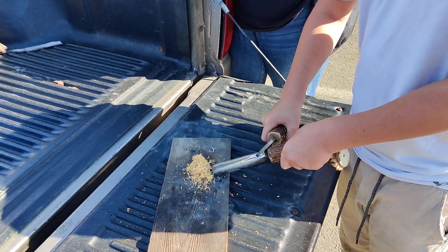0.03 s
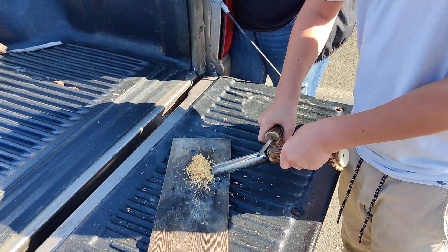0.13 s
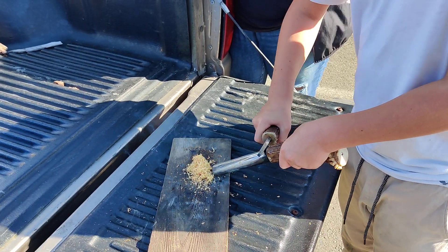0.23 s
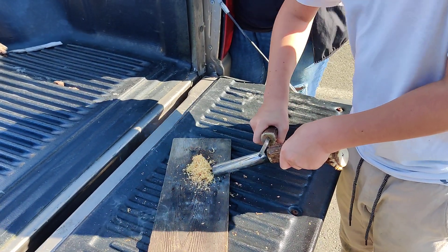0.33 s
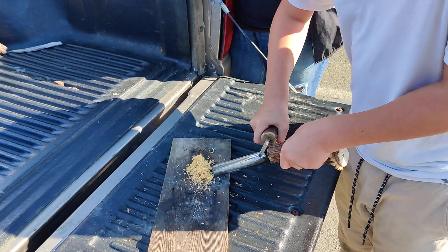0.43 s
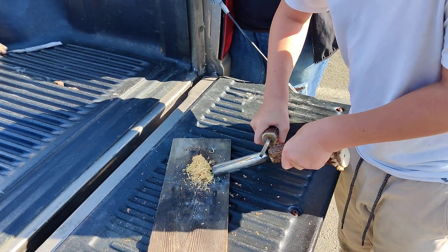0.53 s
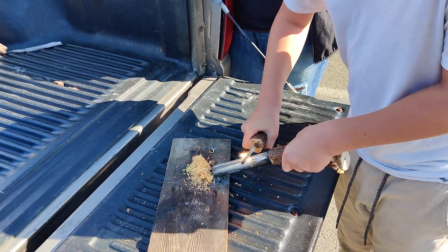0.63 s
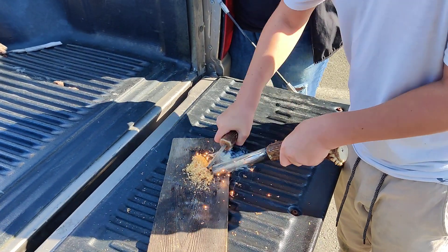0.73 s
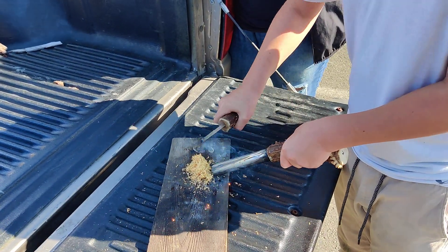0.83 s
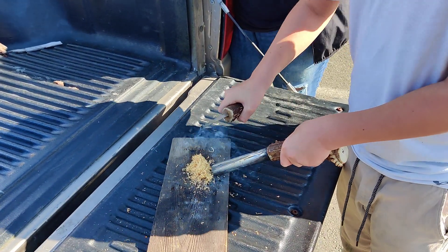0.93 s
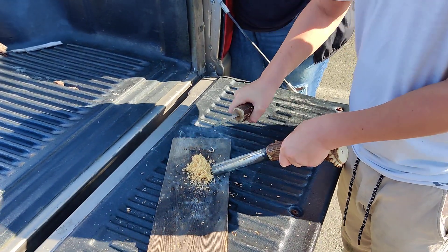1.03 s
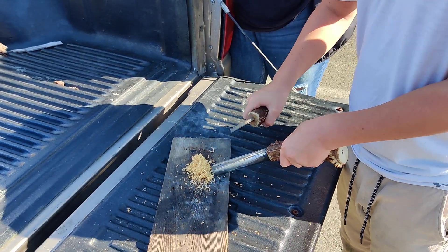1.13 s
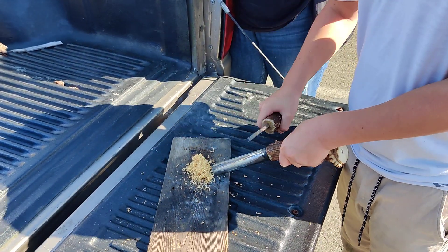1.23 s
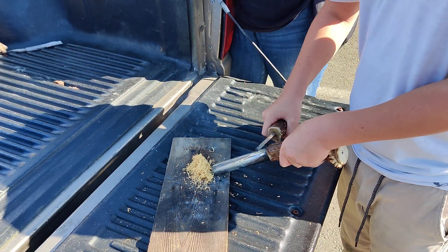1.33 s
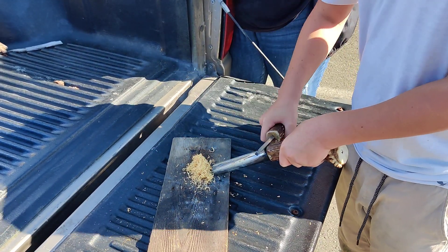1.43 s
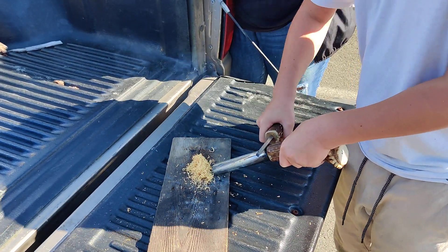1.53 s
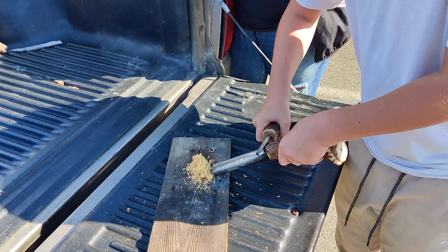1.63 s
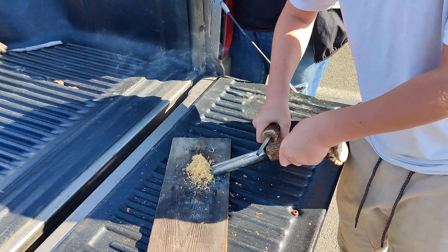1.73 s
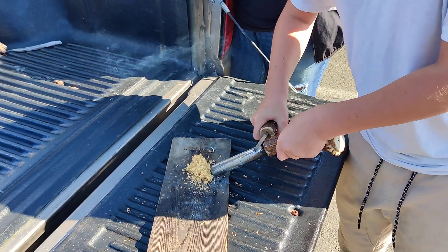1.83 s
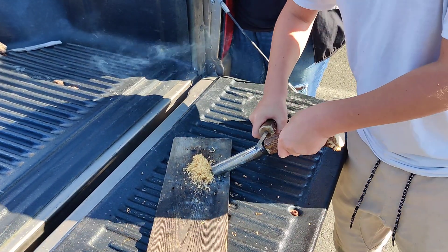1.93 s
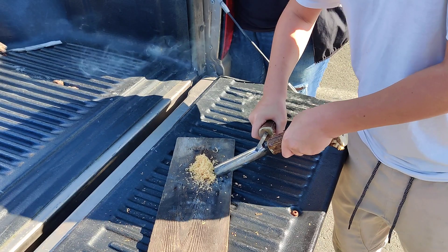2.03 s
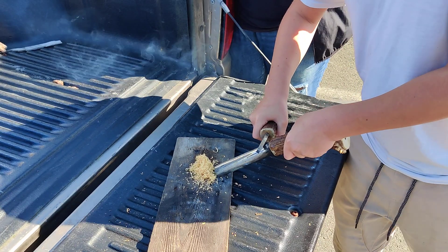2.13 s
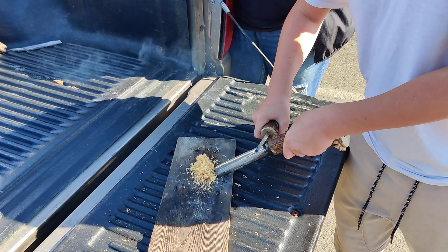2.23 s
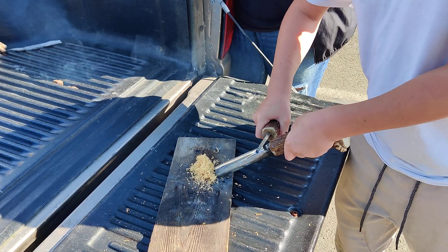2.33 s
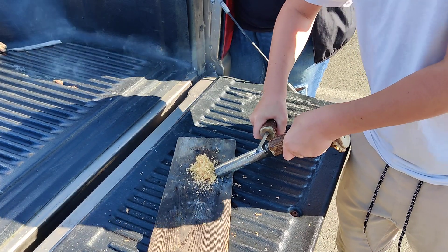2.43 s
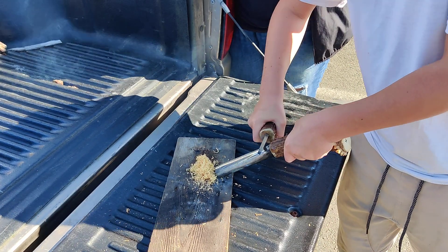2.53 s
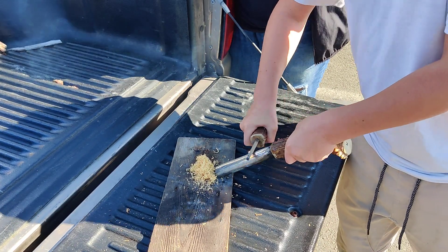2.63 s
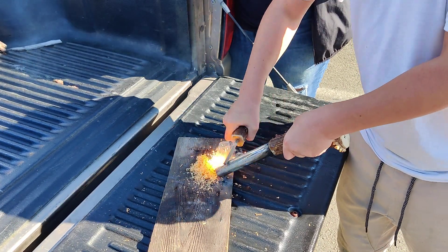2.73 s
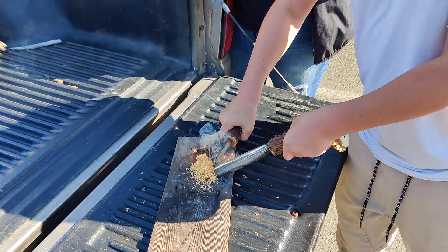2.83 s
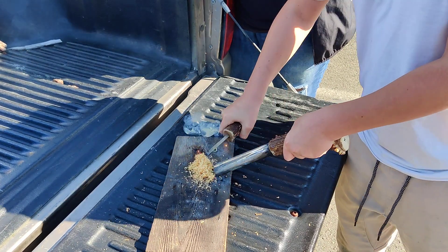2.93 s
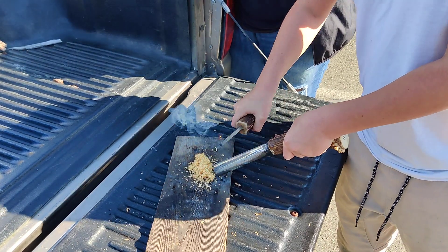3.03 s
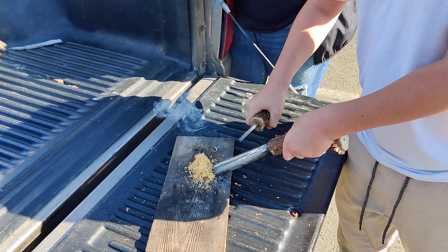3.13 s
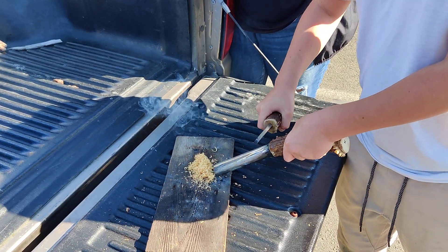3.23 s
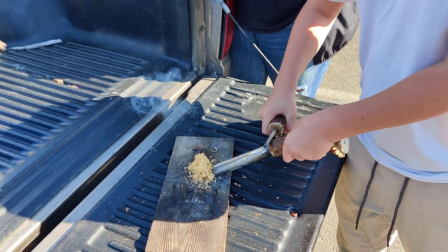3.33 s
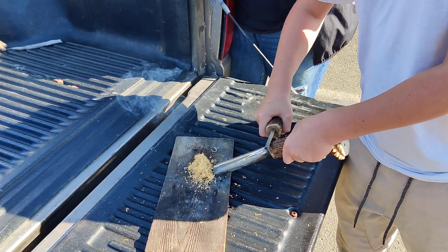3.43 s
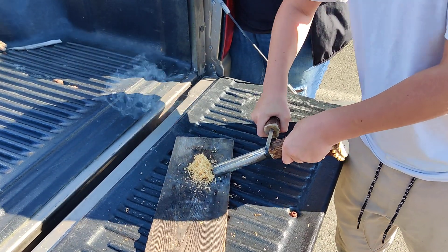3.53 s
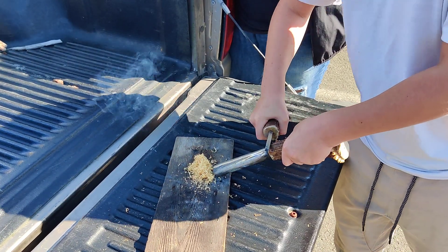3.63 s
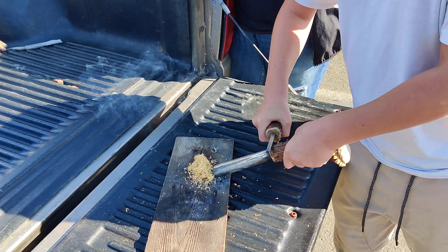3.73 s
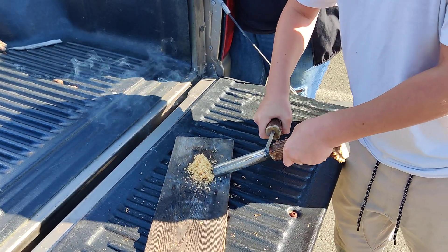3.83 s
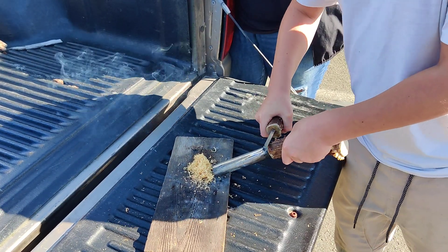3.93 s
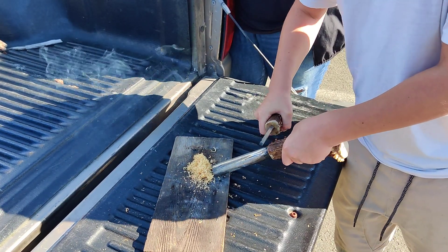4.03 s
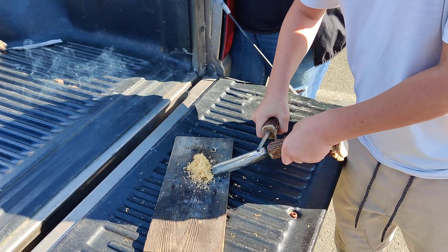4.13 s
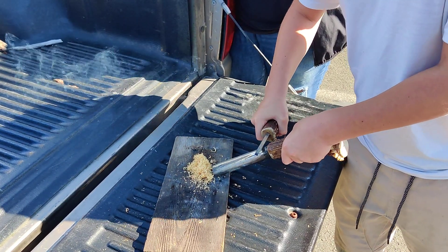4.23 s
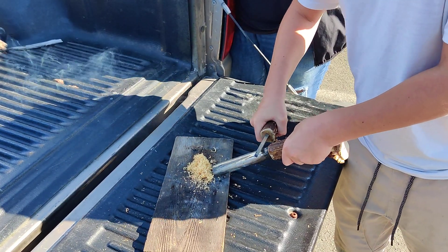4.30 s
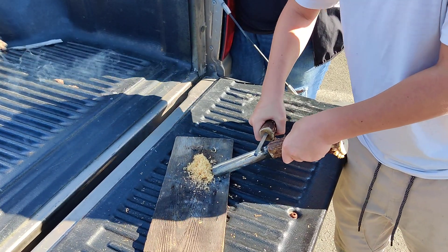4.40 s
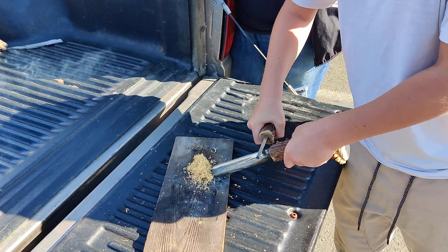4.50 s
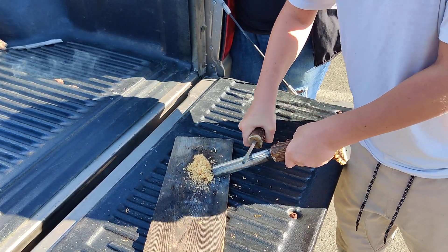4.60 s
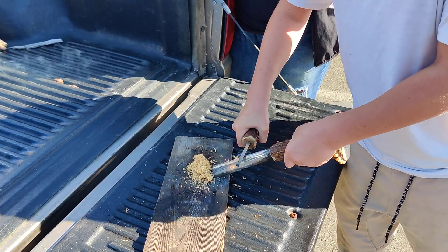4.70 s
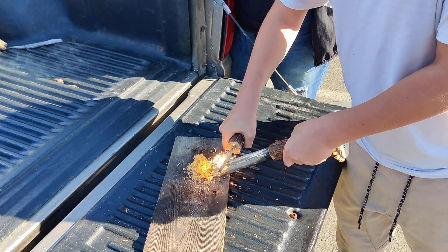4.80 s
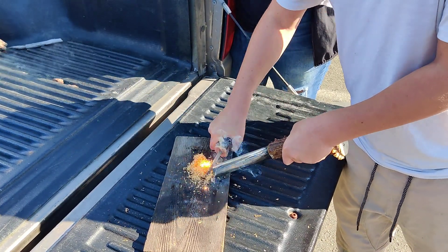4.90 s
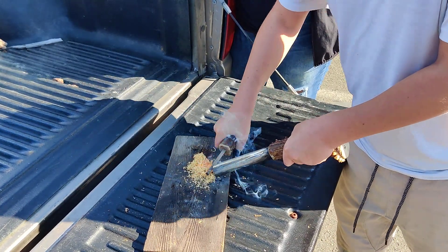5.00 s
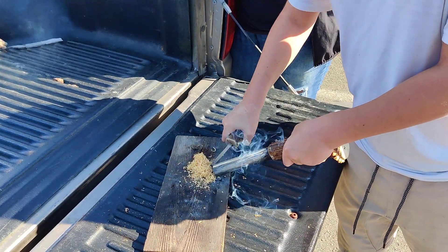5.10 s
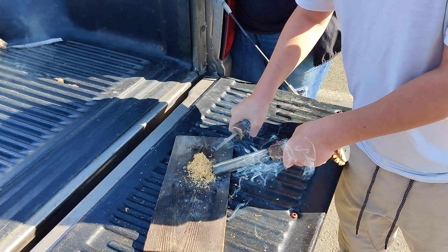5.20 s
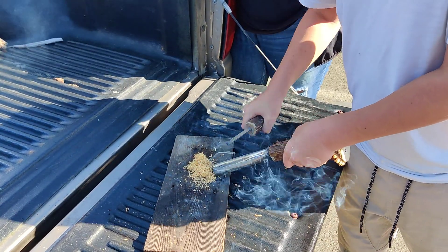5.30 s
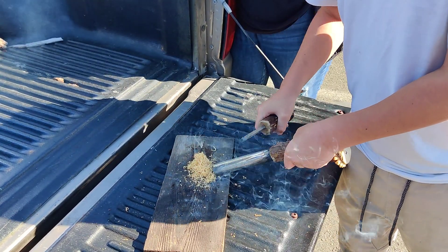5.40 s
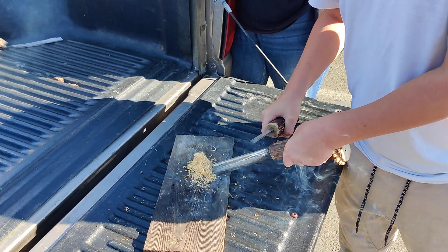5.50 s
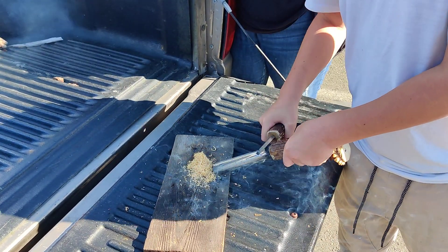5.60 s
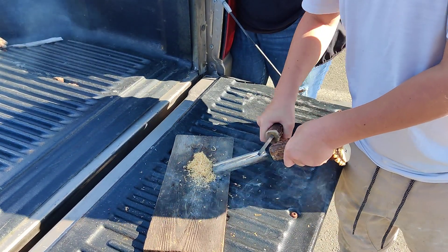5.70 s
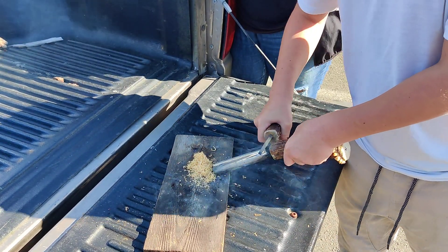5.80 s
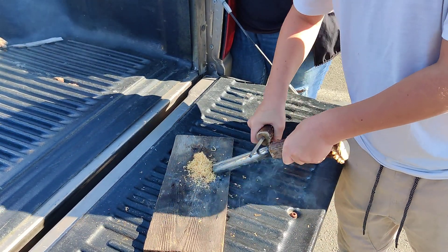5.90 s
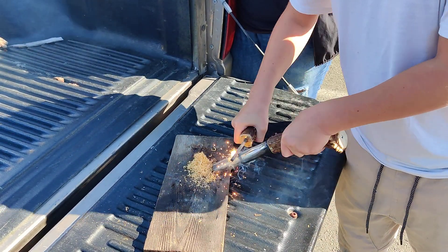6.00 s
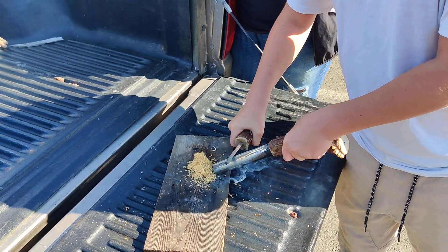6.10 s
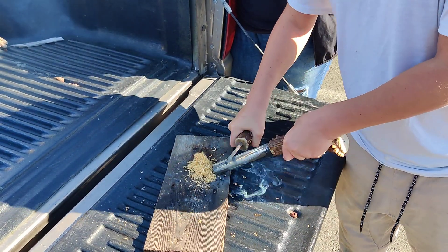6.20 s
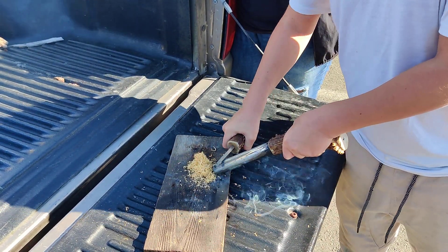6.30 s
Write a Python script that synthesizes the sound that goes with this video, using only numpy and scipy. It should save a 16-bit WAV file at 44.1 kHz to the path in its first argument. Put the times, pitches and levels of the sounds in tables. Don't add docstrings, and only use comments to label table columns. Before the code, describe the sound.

Close up outdoors, a steel blade taps and scrapes down a ferro rod: a hard, gritty rasp with sizzling sparks, a clear clink, a second even rasp, more clinks, then a third stroke ending in a loud slam that booms through the tailgate. A final clink and short rasp follow. Distant traffic and light wind rumble softly behind a phone microphone.

```python
import sys
import numpy as np
from scipy import signal
from scipy.fft import rfft, irfft, next_fast_len
from scipy.io import wavfile
from scipy.ndimage import uniform_filter1d, minimum_filter1d

SR = 44100
rng = np.random.default_rng(int(sys.argv[2]) if len(sys.argv) > 2 else 0)


def digitize_waveform(pressure):
    field = np.atleast_2d(pressure).T
    bounded = np.clip(field, -1, 1)
    quanta = np.round(bounded * 32767).astype(np.int16)
    wavfile.write(sys.argv[1], SR, quanta)


def volts_from_decibels(level):
    exponent = np.asarray(level, float) / 20
    return 10 ** exponent


N = 280035
T = np.arange(N) / SR


def unit(x):
    return x / np.sqrt(np.mean(x ** 2))


def walk(rate, size=N):
    hold = int(SR / rate)
    levels = np.repeat(rng.standard_normal(size // hold + 1), hold)
    return 0.854 * uniform_filter1d(uniform_filter1d(levels, hold), hold)[:size]


def band(x, hz, width):
    return signal.sosfilt(signal.butter(2, [hz - width / 2, hz + width / 2], "band", fs=SR, output="sos"), x)


def ring(modes, rise, spread_hz):
    hz, db, t60 = np.transpose(modes)[:, :, None]
    t = np.arange(int(SR * t60.max())) / SR
    turn = rng.standard_normal((len(hz), 1)) * np.minimum(hz / spread_hz, 2)
    fade = volts_from_decibels(db) * np.exp(-np.log(1000) * t / t60) * (1 - np.exp(-t / rise))
    return np.array([fade * np.sin(2 * np.pi * hz * t + side * turn / 2) for side in (1, -1)])


def bed(x, t60, db, low_hz, high_hz):
    t = np.arange(int(SR * t60)) / SR
    tail = rng.standard_normal((2, SR // 2))[:, :len(t)] * np.exp(-np.log(1000) * t / t60) * (t > .001)
    tail = signal.sosfilt(signal.butter(2, [low_hz, high_hz], "band", fs=SR, output="sos"), tail)
    tail = tail / np.sqrt(np.sum(tail ** 2) / 2)
    return x + volts_from_decibels(db) * signal.oaconvolve(x, tail, axes=1)[:, :N]


def both(mono, pan_db):
    return mono * volts_from_decibels(np.array([pan_db, -pan_db]) / 2)


# f/Hz, level/dB [per Hz]
FIELD_SPECTRUM = [(20, 0.5), (55, -1), (110, -10.5), (210, -14.5), (320, -26), (480, -30), (800, -22),
                  (1050, -24.5), (1300, -32), (2300, -34), (2800, -44), (5000, -47), (6600, -57.5),
                  (16000, -53.5)]
# f/Hz, correlation left to right [0-1]
COHERENCE = [(20, .3), (50, .45), (80, .75), (125, .96), (290, .92), (640, .75), (1400, .5), (3000, .15),
             (16000, .02)]
# peak t/s, level/dB [over the breeze], half length t/s
GUSTS = [
    (0.14, 0, 0.1557),
    (1.885, 4.5, 0.14),
    (3.185, 6.5, 0.1082),
    (4.105, 5, 0.063),
    (4.689, 7.5, 0.254),
    (5.005, 7.5, 0.148),
    (5.37, 15, 0.095),
    (5.737, 6, 0.154),
    (6.097, 7.5, 0.114),
    (6.35, 2.5, 0.0908),
]


def field():
    size = next_fast_len(N)
    hz = np.fft.rfftfreq(size, 1 / SR) + 1
    like_hz, correlation = np.transpose(COHERENCE)
    like = np.clip(np.interp(np.log(hz), np.log(like_hz), correlation), 0, 1)
    field_hz, field_db = np.transpose(FIELD_SPECTRUM)
    tint = volts_from_decibels(np.interp(np.log(hz), np.log(field_hz), field_db))
    mid, side = rfft(rng.standard_normal((2, size))) * tint
    air = np.array([np.sqrt(1 + like) * mid + sign * np.sqrt(1 - like) * side for sign in (1, -1)])
    air = air * volts_from_decibels(-42) / np.sqrt(np.mean(irfft(air.mean(axis=0), size) ** 2))
    breeze_db = 1.5
    gust = breeze_db + sum(db * np.clip(1 - np.abs(T - s) / half, 0, 1) for s, db, half in GUSTS)
    out, swell = 0, .5 * walk(1.5)
    for centre in np.arange(4., 15):
        octave = np.clip(1 - np.abs(np.log2(hz) - centre), 0, 1)
        windy = np.clip((6.9 - centre) / 0.8, 0, 1)
        out = out + irfft(air * octave, size)[:, :N] * volts_from_decibels(windy * gust + swell + 2.0 * walk(4.163))
    return out


# start t/s, length t/s, peak level/dB
RUSTLES = [
    (2.148, 0.368, -74),
    (2.945, 0.408, -73),
    (5.226, 0.509, -67.5),
    (5.763, 0.42, -71.5),
]
# f/Hz, width f/Hz, level/dB
RUSTLE_BANDS = [(3710, 540, -1), (4950, 464, 2), (5596, 640, -0.5)]


def hisses():
    gain = sum(volts_from_decibels(db) * np.sin(np.pi * np.clip((T - s) / length, 0, 1)) for s, length, db in RUSTLES)
    gain = gain * volts_from_decibels(2.8 * walk(27))
    rustle = gain * sum(volts_from_decibels(db - 1.5) * unit(band(rng.standard_normal((2, N)), hz, width))
                        for hz, width, db in RUSTLE_BANDS)
    insects = unit(band(rng.standard_normal((2, N)), hz=8023, width=1450))
    return rustle + volts_from_decibels(-75.5 + 2.4 * walk(2.0)) * insects


# t/s, level/dB
SLAM = [
    (5.003, 3),
    (5.0045, 5),
    (5.0068, 6),
    (5.0133, -0.5),
    (5.022, -4),
    (5.046, -13),
    (5.088, -12.5),
]
# f/Hz, level/dB, t60 t/s
TAILGATE = [(148.7, -11.5, 0.58), (196.4, -8.5, 0.626), (257.9, -17.5, 0.91), (320.9, -20, 0.953),
            (393, -11.5, 0.29), (472, 4.5, 0.116), (558.3, -15.5, 0.088), (610, -21.5, 0.17),
            (691.2, 4.5, 0.088), (788, -2.5, 0.129), (928, -1.5, 0.15), (1119, -1.5, 0.135),
            (1230, 1.5, 0.076), (1354, 8, 0.0435), (1546.5, 6.5, 0.0564), (1801.7, -2.5, 0.097),
            (2158, 5, 0.03266), (2715, -4.5, 0.067), (3180, -9.5, 0.086), (4168, -3.5, 0.062),
            (5370, -2.5, 0.071), (6464, 3.5, 0.02906), (7260, -25.5, 0.06)]


def slam():
    out, start, size = np.zeros((2, N)), int(SLAM[0][0] * SR), SR // 4
    push = np.zeros((1, size))
    for s, db in SLAM:
        age = T[start:start + size] - s
        rattle = volts_from_decibels(db - 25.5) * np.exp(-np.abs(age) / 0.0141) * rng.standard_normal(size)
        push[0] += (age >= 0) * (volts_from_decibels(db) * np.exp(-np.abs(age) / 0.00006) + rattle)
    crowd = np.repeat(TAILGATE, 6, axis=0)
    crowd = crowd * np.exp(rng.standard_normal(crowd.shape) * [.045, 0, .12]) * [1, 1, .85]
    crowd[:, 1] += 1 * (crowd[:, 0] < 420)
    response = ring(crowd, rise=0.5 / crowd[:, :1], spread_hz=1960)
    signs = rng.choice([-1, 1], (len(crowd), 1))
    sheet = unit((response * signs).sum(axis=1))
    boom = signal.fftconvolve(push, sheet, axes=1)[:, :N - start]
    out[:, start:start + boom.shape[1]] = boom / np.abs(boom).max()
    return volts_from_decibels(-1) * bed(out, t60=0.48, db=-21.5, low_hz=400, high_hz=2490)


# f/Hz, level/dB, t60 t/s
HANDLE = [(154.1, 2.5, 0.0463), (230.2, 0.5, 0.037), (292.4, -14.5, 0.21), (425.1, -4.5, 0.1038),
          (337.2, 3.5, 0.04), (455.6, 3, 0.08766), (550.6, 6.5, 0.0682), (505.7, 1, 0.1228),
          (593.3, 4, 0.09), (707.7, 10, 0.0411), (809.3, 15, 0.02007), (648, 13, 0.029)]
ROD = [(1276.6, -7.5, 0.0399), (1511, -9, 0.043), (1666, 2, 0.019), (1850, 6, 0.013477),
       (1890, -6.5, 0.08649), (2143.4, 0.5, 0.0211), (2300, -6, 0.0296), (2719, -7.5, 0.0668),
       (2026, 4, 0.01135)]
BLADE = [(3325, -8, 0.0203), (3656, -10.5, 0.0472), (4171, -9, 0.0357), (4413, -12.5, 0.029),
         (5373, -6, 0.027), (5638, -2.5, 0.02813), (5800.5, -4, 0.0282), (5708, -2, 0.00707),
         (6034, -13.5, 0.03), (8150, -7.5, 0.0037), (7754, -10, 0.0107), (9527, -16.5, 0.0134),
         (6682, 31, 0.00109)]
SIZZLE = [(10180, -1.5, 0.0098), (9695, -3.5, 0.022), (11510, 5, 0.0145), (12930, -8, 0.021),
          (12635, 11, 0.0077), (13827, 4.5, 0.0277), (15050, 8, 0.021), (15220, -16.5, 0.011),
          (11420, 14.5, 0.000593)]


def strike(blows, part, rises):
    out = np.zeros((2, N + SR))
    for s, blade, handle, rod, sizzle, pan in blows:
        for modes, over_db, rise in zip((HANDLE, ROD, BLADE, SIZZLE), (handle, rod, 0, sizzle), rises):
            struck = np.repeat(modes[part], 3, axis=0)
            spot = volts_from_decibels(3.73 * rng.standard_normal((len(struck), 1)))
            detune = np.exp(rng.standard_normal((len(struck), 1)) * [.018, 0, 0])
            struck = struck * detune * [1, 1, .75]
            response = (ring(struck, rise, spread_hz=470) * spot).sum(axis=1)
            start = int((s - rises[2]) * SR)
            size = both(volts_from_decibels(blade + over_db + 2.0), np.array([pan])) / np.abs(response).max()
            out[:, start:start + response.shape[1]] += size * response
    return out[:, :N]


# t/s, crack peak level/dB, rod level/dB and sizzle level/dB [over it], left minus right level/dB
POPS = [(0.8379, -37, -6, 5.5, 1.5), (0.8769, -43, -11.5, 4.5, -16), (0.8825, -38, -12.5, -4.5, 7),
        (0.8937, -44.5, -33, -2.5, -1.5), (0.9218, -48, -11, -2, -2.0), (1.6222, -37, -25, -2.5, 6),
        (1.7828, -50, 0, -8.5, -10.5), (1.927, -36.5, -28, -2, -4), (1.9665, -39.5, -10, -6.5, -7),
        (2.0657, -33.5, -16, -5.5, -1), (2.355, -51, -14, -21.5, -2), (3.0848, -46, -4.5, -2.5, -4),
        (3.2563, -43, -9.5, 10, 2), (6.2686, -42, 0, -4, 6.5)]


def pops():
    board_db = -14
    blows = [(s, db, board_db, rod, sizzle, pan) for s, db, rod, sizzle, pan in POPS]
    return strike(blows, slice(-1, None), rises=(0.0017, 0.000166, 0.00033, 0.000056))


# t/s, blade peak level/dB, handle level/dB and rod level/dB [over it], left minus right level/dB
TAPS = [(0.5749, -49, -11, -12, 15.5), (1.48, -14, -14.5, -14, 0.5), (2.9149, -28.5, -11.5, -4, 1),
        (3.3131, -53.5, -1, 1, 5.5), (3.4035, -41.5, 8.5, -2.5, 1), (4.2395, -16.5, -10, -6.5, -1.5),
        (4.3603, -51.5, -4.5, 4, 4.5), (4.648, -36, -27.5, 5.5, -1.5), (5.0884, -33, 9.5, -8.5, -1),
        (5.208, -39, 4, -3, 1.5), (5.219, -43, 0, 3, 0), (5.6965, -16, -11, -5, 1),
        (6.337, -35, -13, -2.5, 8.5)]


def taps():
    sizzle_db = -14
    blows = [(s, db, board, rod, sizzle_db, pan) for s, db, board, rod, pan in TAPS]
    return strike(blows, slice(-1), rises=(0.0296, 0.00213, 0.001, 0.0003))


# t/s, peak level/dB, length t/s, f/Hz
CATCHES = [(0.713, -18.5, 0.0104, 2017), (0.745, -21, 0.0082, 2024), (0.7629, -15, 0.0126, 1607),
           (0.785, -25, 0.0203, 2300), (2.702, -21.5, 0.014, 1850), (2.743, -20.5, 0.0142, 1850),
           (2.9, -29, 0.0089, 1965), (4.653, -33, 0.0415, 2193), (4.863, -34.5, 0.0176, 2229),
           (5.966, -33.5, 0.0121, 2253), (5.996, -25, 0.0044, 2300), (6.013, -23, .008, 1957),
           (6.03, -31, .02, 2086), (5.001, -7, 0.00834, 1298), (4.989, -15.5, .004, 2092),
           (6.004, -25, 0.01904, 510.4), (6.042, -25.5, 0.0094, 526), (2.897, -29, 0.0204, 544.2),
           (0.718, -34, 0.0244, 512.4), (2.066, -41, 0.004, 3043), (6.16, -40, 0.0096, 2947)]


def catches():
    out, size = np.zeros((2, N + SR)), SR // 10
    for s, db, length, hz in CATCHES:
        start, age = int(s * SR), T[:size] / length
        shape = np.clip(age * 4.1, 0, 1) * np.clip(1.5 - age, 0, 1)
        jitter = 0.0903 * np.cumsum(rng.standard_normal(size))
        tone = unit(np.sin(2 * np.pi * hz * T[:size] + jitter))
        out[:, start:start + size] += volts_from_decibels(db - 8.5) * shape * tone
    return out[:, :N]


def brush(start, length, db, speed, dig):
    land_s, lift_s, edge_db = .006, .014, -46.5
    times = (start - land_s, start, start + length, start + length + lift_s)
    return [(s, db + edge, speed, dig) for s, edge in zip(times, (edge_db, 0, 0, edge_db))]


# t/s, blade pressure level/dB, speed [0-1], how deep the edge digs [0-1]
STROKES = [
    [(0.663, -52, 0.47, 0.22), (0.69, -38.5, 0.5, 0.65), (0.713, -32.5, 0.99, 0.72),
     (0.745, -24.5, 0.87, 0.26), (0.771, -22.5, 0.82, 0.68), (0.819, -41, 0.44, 1),
     (0.832, -80, 0.46, 0.93)],
    [(2.676, -39, 0.16, 0.41), (2.712, -32, 0.5, 0.74), (2.732, -31, 1, 0.11), (2.752, -28, 1, 0.86),
     (2.79, -28, 1, 0.47), (2.826, -35.5, 0.71, 0.42), (2.912, -40, 0.46, 0.35), (2.945, -69.5, 0.55, 1)],
    [(4.636, -54, 0.16, 0), (4.644, -31, 0.74, 0.31), (4.666, -33.5, 0.1, 0.25), (4.72, -38, 1, 0.33),
     (4.77, -36.5, 0.96, 0.05), (4.8, -35, 0.76, 0.12), (4.822, -38, 0.17, 0.56), (4.845, -32, 0.77, 0.49),
     (4.87, -27.5, 0.96, 0.39), (4.97, -35, 0.79, 0.76), (5.03, -24, 0.1, 1)],
    [(5.988, -47, 0.38, 0.95), (5.996, -33, 0.58, 0.53), (6.019, -28.5, 0.85, 0.62),
     (6.07, -26.5, 0.67, 0.2), (6.115, -39, 1, 0.23), (6.15, -67.5, 0.6, 0.69)],
]
# start t/s, length t/s, pressure level/dB, speed [0-1], dig [0-1]
BRUSHES = [(0.571, 0.0167, -57.5, 0.54, 0.8), (0.834, 0.01203, -47.5, 1, 0.91),
           (1.737, 0.0504, -56.5, 0.79, 0.62), (1.847, 0.058, -59, 0.57, 0.65),
           (1.991, 0.09, -56.5, .15, 1), (2.058, 0.0565, -48, 0.36, 0.66), (2.118, 0.0287, -59, .3, 0.4),
           (2.946, 0.0832, -60, 0.53, 1), (5.024, .075, -38.5, 0.7, .45),
           (5.964, 0.0109, -38.5, 0.31, 0.36), (6.16, 0.0556, -37, 0.05, 0.29),
           (6.334, 0.028, -39, 0.38, 0.69)]


def strokes():
    skim_db, dug_db = -10, 3.5
    slow_db, fast_db = -17.5, 0
    board_start_db, board_end_db = -8.5, -5.5
    pan_start_db, pan_end_db = 1, -1.98
    hum_db, hum_s = -1, 0.0806
    gains, pan_db, near = np.zeros((4, N)), np.zeros(N), np.zeros(N, bool)
    for stroke in STROKES + [brush(*row) for row in BRUSHES]:
        s, *controls = np.transpose(stroke)
        on = (T >= s[0]) & (T <= s[-1])
        blade, speed, dig = (np.interp(T[on], s, c) for c in controls)
        along = (T[on] - s[0]) / (s[-1] - s[0])
        rod = blade + skim_db + (dug_db - skim_db) * dig
        board = rod + board_start_db + (board_end_db - board_start_db) * along
        sizzle = blade + slow_db + (fast_db - slow_db) * speed
        gains[:, on] = np.hypot(gains[:, on], volts_from_decibels(np.array([board, rod, blade, sizzle])))
        pan_db[on] = pan_start_db + (pan_end_db - pan_start_db) * along
        near |= (T >= s[0] - .01) & (T <= s[-1] + .12)
    keep = np.exp(-1 / (hum_s * SR))
    gains[0] += volts_from_decibels(hum_db) * signal.lfilter([1 - keep], [1, -keep], gains[0])
    return uniform_filter1d(gains, 88, axis=1), pan_db, np.flatnonzero(near)


def grit(size, rate, scatter_db, judder_db):
    torn = rng.random(size) < rate / SR
    clicks = torn * rng.standard_normal(size) * volts_from_decibels(scatter_db * rng.exponential(size=size))
    return unit(clicks * volts_from_decibels(judder_db * (walk(250, size) + walk(60.226, size))))


FAMILY_PAN_DB = (1, 0, 1, -0.5)


def scrape():
    gains, pan_db, moving = strokes()
    grits = [grit(len(moving), rate=11000, scatter_db=1.06, judder_db=2.5) for _ in range(3)]
    out = np.zeros((2, N))
    families = (HANDLE, ROD, BLADE, SIZZLE)
    for modes, gain, apart, lean in zip(families, gains, (.12, .35, .6, .65), FAMILY_PAN_DB):
        drive = np.sqrt(1 - apart) * grits[0] + np.sqrt(apart) * np.array(grits[1:])
        damped = np.array(modes) * [1, 1, .5]
        response = ring(damped, rise=0.000298, spread_hz=2010)
        response = response / np.sqrt(np.sum(response.sum(axis=1) ** 2) / 2)
        force = both(drive * gain[moving], np.array([lean]))
        for k in range(len(modes)):
            share = volts_from_decibels(5.31 * walk(35.044, size=len(moving)) - 4.5)
            out[:, moving] += signal.oaconvolve(force * share, response[:, k], axes=1)[:, :len(moving)]
    lag = SR * (0.000529 + 0.00025 * np.sin(2 * np.pi * 3.3 * T + np.array([[0], [1.4]])))
    bounce = [np.interp(np.arange(N) - late, np.arange(N), port) for late, port in zip(lag, out)]
    return both(out + 0.062 * np.array(bounce), pan_db) * volts_from_decibels(0.37)


def scene():
    blows = bed(taps() + pops(), t60=0.334, db=-15.5, low_hz=298.6, high_hz=1117)
    rasp = bed(scrape() + catches(), t60=0.0358, db=-10.5, low_hz=323.2, high_hz=5170)
    return field() + hisses() + slam() + blows + rasp


def patches(x):
    patch_hz, patch_s, from_hz, drop_share = 260, .046, 2500, .16
    waver_db, dropout_db, sudden_db = 2.5, -40, 9
    hz, s, z = signal.stft(x, SR, "hann", 1024)
    row, col = (hz / patch_hz).astype(int), (s / patch_s).astype(int)
    luck = rng.random((2, row[-1] + 1, col[-1] + 2))
    out = (luck[0, :, 1:] < drop_share / 2) | (luck[0, :, :-1] < drop_share / 2)
    db = waver_db * 2 * (2 * luck[1, :, 1:] - 1) + dropout_db * out
    treble = 10 * np.log10(np.sum(np.abs(z[:, hz > from_hz]) ** 2, axis=(0, 1)) + 1e-18)
    steady = minimum_filter1d(np.diff(treble, prepend=0) < sudden_db, size=3)
    gain = volts_from_decibels(db[row][:, col] * (hz > from_hz)[:, None] * steady)
    return signal.istft(z * gain, SR, "hann", 1024)[1][:, :N]


def band_limit(x):
    return signal.sosfilt(signal.butter(12, 16820, fs=SR, output="sos"), x)


def record(dry):
    rounded = np.tanh(0.7114 * dry) / 0.6655
    top_cut = signal.ellip(8, .2, 60, 15650, fs=SR, output="sos")
    mix = signal.sosfilt(top_cut, patches(rounded))
    return band_limit(mix)


dry = scene()
out = record(dry)
digitize_waveform(out)
```